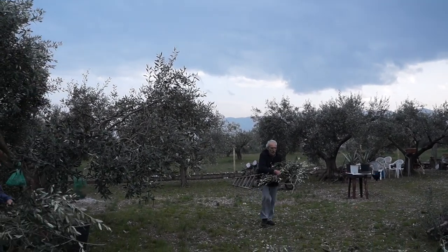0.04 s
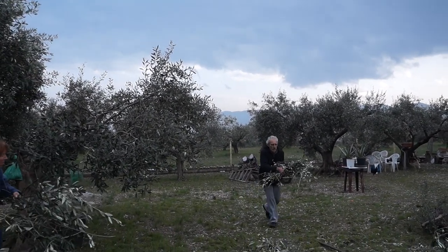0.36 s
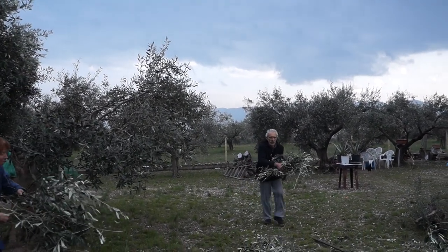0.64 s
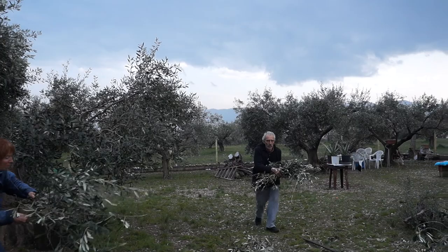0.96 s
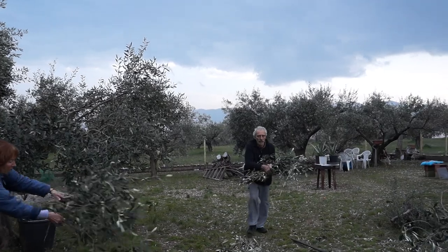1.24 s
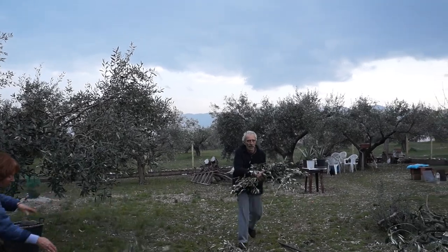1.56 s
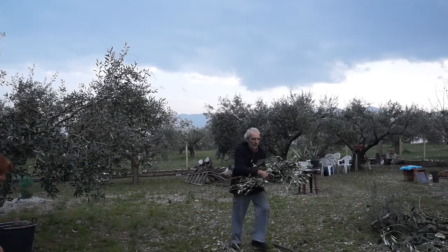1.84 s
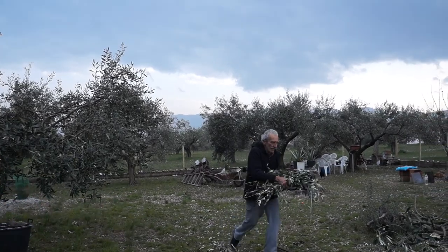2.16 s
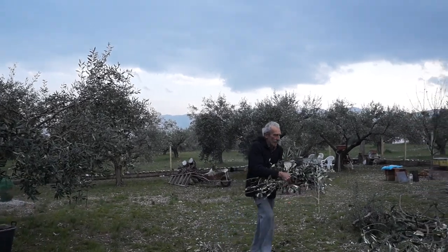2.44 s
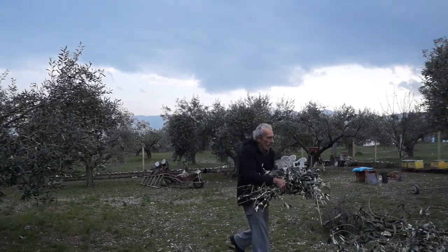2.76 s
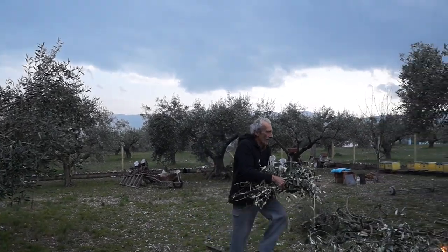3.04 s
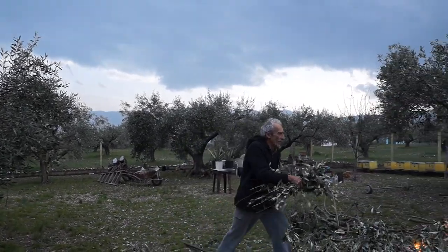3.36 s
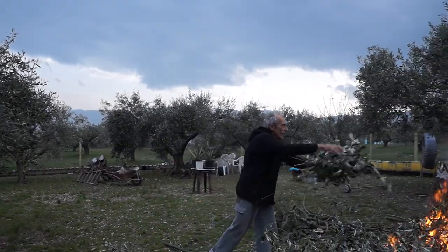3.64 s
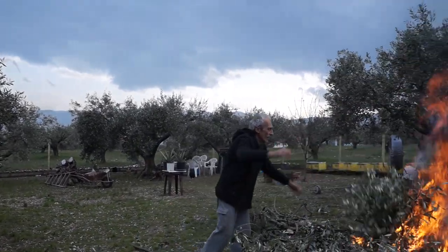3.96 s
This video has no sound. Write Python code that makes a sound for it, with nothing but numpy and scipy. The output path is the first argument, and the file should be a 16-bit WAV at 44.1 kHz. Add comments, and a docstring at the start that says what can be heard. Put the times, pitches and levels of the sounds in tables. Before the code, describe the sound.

Branches burn in an orchard, giving a fine crackle and dry, uneven snaps slightly right of the microphone. A wavering hiss and a faint rumble of flames continue underneath, and the loudest pops come before the middle.

```python
"""Bonfire in an orchard

Leafy branches burn a little to the right. Turbulent flames flare with a low roar, boiling sap
hisses, and twigs burst in sharp pops over a fine crackle. Each pop reflects off the ground,
scatters in the trees and returns once from a hard surface nearby. The loudest pops drive a
limiter, which ducks the fire for a moment."""
import sys
import numpy as np
from scipy import signal
from scipy.fft import rfft, irfft
from scipy.io import wavfile
from scipy.ndimage import uniform_filter1d, minimum_filter1d

SR = 44100
rng = np.random.default_rng(int(sys.argv[2]) if len(sys.argv) > 2 else 0)


def int16_out(signal):
    """Quantize to a 16-bit WAV file."""
    q = np.round(np.clip(np.atleast_2d(signal).T, -1, 1) * 32767)
    wavfile.write(sys.argv[1], SR, q.astype(np.int16))


N = 4 * SR
SCENE_HZ, BURST_HZ = np.fft.rfftfreq(N, 1 / SR), np.fft.rfftfreq(1024, 1 / SR)


def amp(db):
    """Amplitude ratio of a level in decibels."""
    return 10 ** (np.asarray(db) / 20)


def unit_rms(x):
    """Normalisation to unit mean power."""
    return x / np.sqrt(np.mean(x ** 2) + 1e-20)


def curve(points, hz):
    """Interpolation on a logarithmic frequency axis."""
    f, value = np.transpose(points)
    return np.interp(np.log(hz + 1), np.log(f + 1), value)


def envelope(points):
    """Gain at every sample, interpolated linearly in decibels."""
    return amp(np.interp(np.arange(N) / SR, *np.transpose(points)))


def add(mix, start_s, sound):
    """Superposition of a sound onto the mix."""
    part = mix[..., max(round(start_s * SR), 0):][..., :sound.shape[-1]]
    part += sound[..., :part.shape[-1]]


def correlate(pair, coherence):
    """Partial coherence: two independent signals are mixed to share a component."""
    coherence = np.clip(coherence, 0, 1)
    return np.array([pair[0], coherence * pair[0] + np.sqrt(1 - coherence ** 2) * pair[1]])


def noise(spectrum, coherence):
    """Spectral shaping of white noise into partly coherent stereo noise of rms 1."""
    white = correlate(rfft(rng.standard_normal((2, N))), curve(coherence, SCENE_HZ))
    return unit_rms(irfft(white * amp(curve(spectrum, SCENE_HZ)), N))


def flutter(rms_db, scale_s):
    """Random amplitude modulation: a gain whose level follows low-passed noise."""
    drift = irfft(rfft(rng.standard_normal(N)) / (1 + (2 * SCENE_HZ * scale_s) ** 2), N)
    return amp(rms_db * unit_rms(drift))


def minimum_phase(db):
    """Causal response with the given gains; minimum phase keeps an onset sharp."""
    log_gain = np.log(amp(np.r_[db, db[-2:0:-1]]))
    return np.exp(np.conj(signal.hilbert(log_gain)))[:len(db)]


# Flaring of the flames (time [s], level [dB])
FLAME_LEVEL = [(0, -44.5), (.58, -46.5), (.78, -40.5), (1.05, -34.5), (1.17, -40.5), (1.52, -36.5),
               (1.92, -49), (2.1, -38.5), (2.38, -36.5), (2.5, -39.5), (2.8, -34), (2.87, -41.5),
               (3.01, -38), (3.14, -36.5), (3.3, -43), (3.46, -42.5), (3.6, -39), (3.82, -36.5), (4, -42.5)]
# Spectrum of the roar (frequency [Hz], relative level [dB])
ROAR_SPECTRUM = [(20, -18), (70, -2), (230, -2), (330, -5.5), (560, -16.5), (770, -9.5), (1000, -19),
                 (1400, -26.5), (3000, -34.5), (8000, -82)]
# Likeness of left and right (frequency [Hz], coherence [0-1])
ROAR_COHERENCE = [(200, 0.98), (550, 0.77), (3000, 0.23)]
def roar():
    """Turbulent combustion radiates low-frequency noise that flutters as the flames flare."""
    turbulence = noise(ROAR_SPECTRUM, ROAR_COHERENCE) * flutter(rms_db=1.7, scale_s=0.027)
    return envelope(FLAME_LEVEL) * unit_rms(turbulence)


# Boiling of the sap, which drives hiss and crackle (time [s], relative level [dB])
SAP_LEVEL = [(0, -34.5), (.24, -47), (.41, -44.5), (.56, -42), (.78, -39), (1.19, -41), (1.37, -26),
             (1.52, -38.5), (1.68, -30.5), (1.84, -43), (2.06, -42.5), (2.22, -34), (2.35, -39),
             (2.62, -39), (2.8, -38), (2.96, -42.5), (3.1, -38), (3.3, -37.5), (3.48, -44.5), (3.64, -34.5),
             (3.84, -39.5), (4, -29)]
# Spectrum of the hiss (frequency [Hz], relative level [dB])
HISS_SPECTRUM = [(300, -24), (900, -5.5), (2200, -1.5), (6300, 2), (7500, 6.5), (8600, 4), (11000, -7)]
# Likeness of left and right (frequency [Hz], coherence [0-1])
HISS_COHERENCE = [(1500, 0.41), (7000, 0.82), (10000, 0.31)]
def hiss():
    """Jet noise: steam sputters out of green wood."""
    steam = noise(HISS_SPECTRUM, HISS_COHERENCE) * flutter(rms_db=2.5, scale_s=0.012)
    return amp(-1.5) * envelope(SAP_LEVEL) * unit_rms(steam)


def rupture(decay_ms):
    """Spectrum of a fracture: an impulse, then fibres tearing with exponential decay."""
    ms = np.arange(512) * 1000 / SR
    fibres, grain = rng.standard_normal((2, len(ms)))
    tear = fibres * np.exp(0.56 * grain - ms / decay_ms) * (ms > ms[4])
    tear_share = 0.72 * decay_ms ** 2 / (decay_ms ** 2 + 0.55 ** 2)  # short breaks are clean clicks
    pulse = np.sqrt(tear_share) * tear / np.linalg.norm(tear)
    pulse[0] = np.sqrt(1 - tear_share)
    spectrum = rfft(pulse, 2 * len(ms))
    colour_db = 10 * np.log10(uniform_filter1d(abs(spectrum) ** 2, size=9))
    return spectrum * minimum_phase(-0.11 * colour_db)  # slight flattening keeps it dry


GROUND_DELAY_S, GROUND_CUTOFF_HZ = 0.001349, 6700
def ground(bounce_db):
    """Comb filter: direct sound interferes with its inverted, duller reflection off the grass."""
    delay_s = GROUND_DELAY_S * (1 + 0.083 * rng.standard_normal())  # twigs differ in height
    bounce = amp(min(bounce_db, -2)) * np.exp(-2j * np.pi * BURST_HZ * delay_s)
    return 1 - bounce / (1 + 1j * BURST_HZ / GROUND_CUTOFF_HZ)


# Colour of breaking wood, shared by crackle and pops (frequency [Hz], gain [dB])
SNAP_SPECTRUM = [(250, -20.5), (900, -10.5), (1500, -12), (2250, -10), (2800, -7.5), (3600, -5.5),
                 (6300, -1), (7300, 3.5), (8800, -1), (10000, -7.5), (11000, -13)]
# Weaker body of small twigs (frequency [Hz], gain [dB])
SMALL_TWIG_TILT = [(1000, -5), (4000, 0)]
def crackle(kinds=30, rate_per_s=280):
    """A Poisson process of bursting leaves and small twigs, louder when more sap boils."""
    strength = amp(7 * np.minimum(rng.exponential(1, N), 3.1))
    impulses = strength * (rng.random(N) < rate_per_s / SR)
    kind, out = rng.integers(0, kinds, N), np.zeros((2, N))
    twig_db = curve(SNAP_SPECTRUM, BURST_HZ) + curve(SMALL_TWIG_TILT, BURST_HZ)
    for k in range(kinds):
        colour = np.c_[np.geomspace(600, 11000, 7), 5.5 * rng.standard_normal(7)]
        spectrum = rupture(decay_ms=0.56 * rng.uniform(0.66, 3)) * ground(bounce_db=-5)
        spectrum *= minimum_phase(twig_db + curve(colour, BURST_HZ))
        ticks = signal.oaconvolve(impulses * (kind == k), unit_rms(irfft(spectrum)))[:N]
        out += ticks * amp(rng.standard_normal() * np.array([[1], [-1]]))
    return amp(-1.74) * envelope(SAP_LEVEL) * unit_rms(out)


# Envelope of the scatter from the trees (delay [s], relative level [dB])
SCATTER_ENVELOPE = [(.003, 9.5), (.014, 14.5), (.024, 6.5), (.035, 11), (.046, 15), (.06, -3.5), (.1, 0),
                    (.25, -45)]
def tree_scatter(sound, paths=6):
    """Diffuse scattering by trunks and foliage; pops from different spots take different paths."""
    t, out = np.arange(SR // 4) / SR, np.zeros((2, N))
    path = np.arange(N) // 256 % paths
    decay = amp(np.interp(t, *np.transpose(SCATTER_ENVELOPE))) * (t > 2 * GROUND_DELAY_S)
    for k in range(paths):
        taps = rng.standard_normal((2, len(t))) * (rng.random((2, len(t))) < 0.15)
        tail = correlate(taps, coherence=0.66) * decay
        tail /= np.linalg.norm(tail[0])
        out += signal.fftconvolve((sound * (path == k))[None], tail, axes=1)[:, :N]
    return amp(-9) * out


# Body, middle and treble bands of a pop (lower edge [Hz], upper edge [Hz])
POP_BANDS = [(500, 1800), (1800, 4800), (4800, 11000)]
# Bursting twigs, with band energies ahead of the limiter
# (time [s], body [dB], middle [dB], treble [dB], decay time of the tearing [ms])
TWIG_BURSTS = [(0.0195, -22, -8.5, -15, 0.46), (0.0963, -33, -19.5, -15, 3.8),
               (0.1406, -43, -16, -22, 0.87), (0.151, -25.5, -25, -7, 0.47),
               (0.1545, -25, -24.5, -10.5, 0.8), (0.1962, -30, -24.5, -14.5, 1.3),
               (0.29, -35, -18, -16, 1.5), (0.3145, -41, -42, -18, 1.9), (0.3226, -28.5, -19, -11.5, 1.3),
               (0.4323, -54, -22, -16.5, 0.23), (0.4423, -28, -13.5, -9.5, 0.37),
               (0.546, -37, -24, -17, 3.1), (0.5772, -46, -40, -24, 0.3), (0.622, -39, -19, -15.5, 1.4),
               (0.6264, -32, -24, -13.5, 2.4), (0.741, -40, -24, -19, 2.3), (0.8214, -28, -21, -11.5, 1.5),
               (0.833, -37, -18.5, -22, 0.28), (0.9487, -37, -29, -23, 2.9),
               (0.9875, -43, -27.5, -21, 0.24), (1.044, -34, -53, -18, 2.8),
               (1.0678, -29.5, -11.5, -10, 0.63), (1.1206, -27.5, -26, -13.5, 0.18),
               (1.2055, -29, -14.5, -20.5, 1.3), (1.2163, -24, -44, -13, 0.67),
               (1.2338, -16.5, -7.5, -7, 0.093), (1.248, -17.5, -30, -5.5, 1.4),
               (1.2885, -11.5, 0.5, -2, 0.81), (1.364, -19.5, -20, -4.5, 0.65),
               (1.448, -55, -28, -14.5, 2.2), (1.555, -13.5, -8, -2, 0.93), (1.5645, -30, -12, -10.5, 0.93),
               (1.6463, -28, -23.5, -8, 0.3), (1.74, -24, -14.5, -10.5, 1.5),
               (1.8547, -27.5, -15.5, -12, 0.49), (1.9356, -39, -20, -33, 0.63),
               (1.9728, -36, -23, -14.5, 1.6), (2.084, -41, -35, -19.5, 2.7), (2.0974, -25, -21, -53, 1.3),
               (2.1575, -40, -19, -32, 0.67), (2.1683, -30, -29, -18, 2.5), (2.1882, -23, -14.5, -9, 0.9),
               (2.2536, -32.5, -18, -14, 2), (2.3772, -40, -32, -21, 4.2), (2.4094, -24, -11.5, -24, 0.83),
               (2.421, -35, -23, -22, 1.5), (2.431, -25, -19.5, -7, 1.2), (2.6729, -32, -30, -19, 2.9),
               (2.7862, -33, -28, -22, 9.1), (2.7979, -22.5, -27.5, -15.5, 4.1),
               (2.8222, -31, -21, -11, 0.69), (2.908, -36.5, -38, -20.5, 2.8),
               (3.0194, -18, -11.5, -1, 1.08), (3.1712, -30, -19.5, -16.5, 0.61),
               (3.1809, -27, -23, -4.5, 0.18), (3.1916, -19.5, -13, -1.5, 0.42),
               (3.343, -21, -13, -5, 0.58), (3.3904, -28.5, -22.5, -13, 0.9),
               (3.5217, -31, -39, -24.5, 1.6), (3.5987, -29, -26.5, -12.5, 2.1),
               (3.6131, -24.5, -33, -25, 3.5), (3.7, -51, -40, -18.5, 0.35), (3.735, -40, -29, -24, 2.5),
               (3.7665, -29.5, -29.5, -11.5, 1), (3.7809, -36, -23.5, -14, 1.5),
               (3.8696, -21.5, -17.5, -7, 1.43), (3.99, -27.5, -24, -13, 1.9)]
ECHO_DELAY_S, ECHO_SPREAD_S, ECHO_DB, ECHO_LEFT_DB = 0.028, 0.00038, -12, 7.5
def pops():
    """Multipath propagation: each burst travels to the listener, into the trees and via one echo."""
    direct, outward, echo = np.zeros((3, N))
    snap = minimum_phase(curve(SNAP_SPECTRUM, BURST_HZ))
    centres_hz = np.sqrt(np.prod(POP_BANDS, 1))
    bands = [(BURST_HZ > low) & (BURST_HZ < high) for low, high in POP_BANDS]
    for start_s, *band_db, decay_ms in TWIG_BURSTS:
        spectrum = rupture(decay_ms) * snap
        comb = ground(bounce_db=1 + 0.55 * band_db[0])  # thick branches lie low and have most body
        energy = np.array([np.sum(abs((spectrum * comb)[band]) ** 2) for band in bands])
        unshaped_db = 10 * np.log10(energy / len(BURST_HZ) * 1000 / SR)
        spectrum *= minimum_phase(curve(np.c_[centres_hz, band_db - unshaped_db], BURST_HZ))
        add(direct, start_s, irfft(spectrum * comb))
        add(outward, start_s, irfft(spectrum))
        return_s = start_s + ECHO_DELAY_S + ECHO_SPREAD_S * rng.standard_normal()
        add(echo, return_s, irfft(spectrum * rupture(decay_ms=1)))  # the echo is slightly blurred
    return direct, outward, echo * amp(ECHO_DB + ECHO_LEFT_DB * np.array([[0.5], [-0.5]]))


# Direction of pops and crackle (frequency [Hz], left minus right level [dB])
FIRE_PAN = [(300, 6), (900, -4), (1600, -6.5), (3000, -4), (7500, -4), (9000, -8.5), (11000, -5.5)]
def panned(sound):
    """Level differences at constant power place the fire a little to the right."""
    lean_db = curve(FIRE_PAN, SCENE_HZ)
    gains = amp(np.array([lean_db, -lean_db]) / 2)
    return irfft(rfft(sound) * gains / np.sqrt(np.mean(gains ** 2, 0)), N)


def scene():
    """Superposition of the fire and its reflections."""
    direct, outward, echo = pops()
    background = roar() + hiss() + tree_scatter(outward) + echo
    return background + panned(direct + crackle())


def low_pass(x, hz):
    """Steep band limiting by a windowed-sinc filter."""
    kernel = signal.firwin(401, hz, window=("kaiser", 7), fs=SR)
    return signal.oaconvolve(x, kernel[None], "same")


LIMIT_DB, RECOVERY_DB_PER_S = -1, 42.5
def record(dry):
    """Peak limiting in a band-limited channel: the gain drops at the loudest pops, then recovers."""
    heard = low_pass(dry, hz=11100)
    excess_db = np.maximum(20 * np.log10(abs(heard).max(0) + 1e-9) - LIMIT_DB, 0)
    held_db = -minimum_filter1d(-excess_db, size=13)
    recovery_db = np.arange(N) / SR * RECOVERY_DB_PER_S
    duck_db = np.maximum.accumulate(held_db + recovery_db) - recovery_db
    return low_pass(heard * amp(-uniform_filter1d(duck_db, size=13)), hz=12200)


dry = scene()
out = record(dry)
int16_out(out)
```